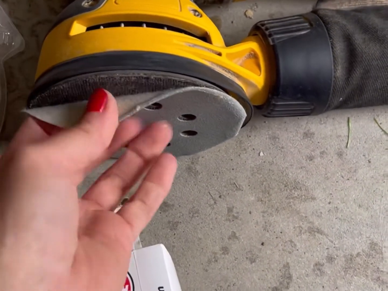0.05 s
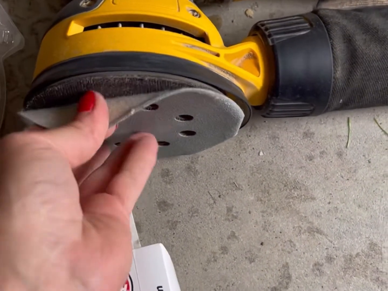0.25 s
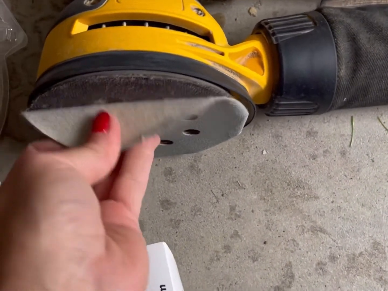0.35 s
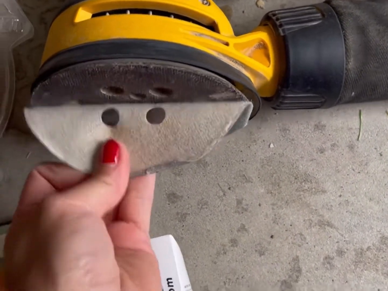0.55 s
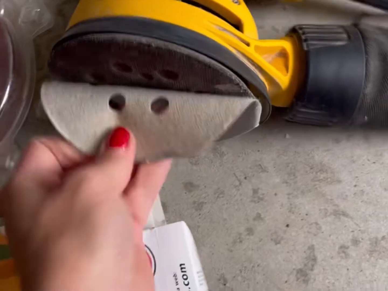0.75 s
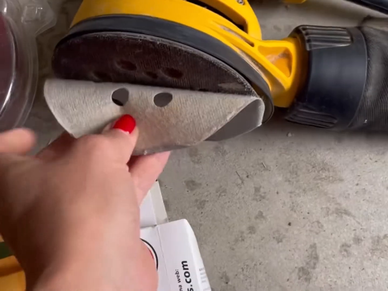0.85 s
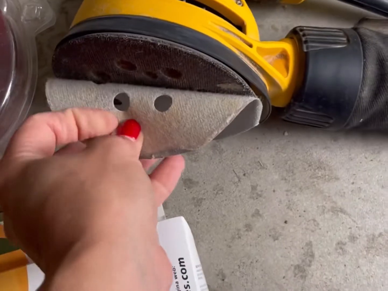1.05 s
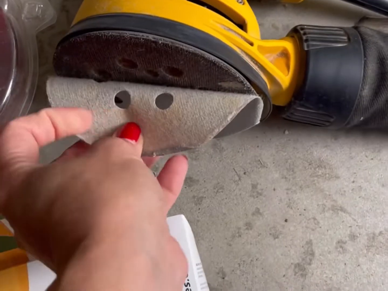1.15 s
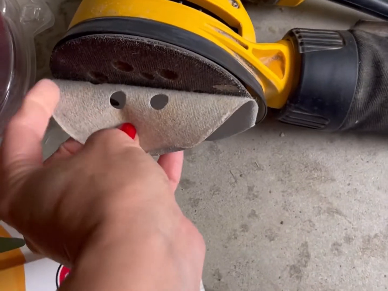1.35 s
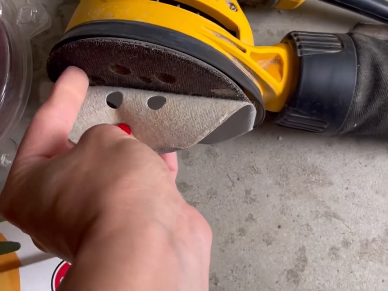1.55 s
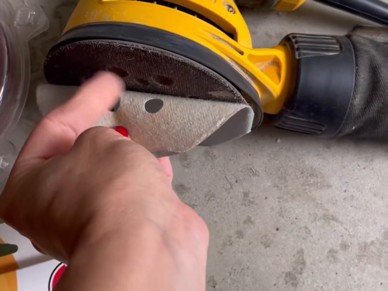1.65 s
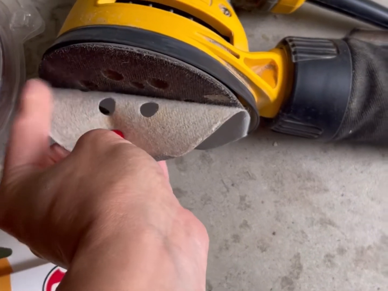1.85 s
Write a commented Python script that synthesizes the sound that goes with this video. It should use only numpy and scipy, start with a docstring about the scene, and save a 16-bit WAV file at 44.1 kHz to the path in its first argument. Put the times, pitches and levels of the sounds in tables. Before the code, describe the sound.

Close, bright hook-and-loop tearing as a stiff sanding disc is peeled from a switched-off sander

```python
"""Fingers rub softly over a workshop's low hum and rumble, then a sanding disc is peeled by hand off the
hook-and-loop pad of a switched-off sander, close to a microphone pair. Hooks tear in ragged bunches of
coloured clicks, in two pulls, and pluck the ringing paper; short click runs snap and slide, and pairs of
partials pop. The disc ticks with cracks and ringing modes, and fingers slide on it as fine grains.
Filtered noise makes the dull bumps of the hand; decaying noise makes the echoes of the room."""
import sys
import numpy as np
from scipy import signal
from scipy.fft import rfft, irfft
from scipy.io import wavfile

SR = 44100
rng = np.random.default_rng(int(sys.argv[2]) if len(sys.argv) > 2 else 0)


def generate_wav(signal):
    """Clip the signal to [-1, 1] and save it as 16-bit WAV at the path in sys.argv[1]."""
    frames = np.transpose(np.atleast_2d(signal))
    scaled = np.clip(frames, -1, 1) * 32767
    pcm = np.round(scaled).astype(np.int16)
    wavfile.write(sys.argv[1], SR, pcm)


N = 83790

# Force of the tearing hooks: (time [s], level [dB])
PEEL_FORCE = [(.13, -66.5), (.185, -49), (.238, -43.5), (.247, -27.5), (.272, -22), (.303, -23.5),
              (.35, -19), (.388, -24), (.402, -31.5), (.42, -35), (.448, -35.5), (.478, -32), (.506, -19.5),
              (.555, -19.5), (.583, -27.5), (.595, -35.5), (.643, -35), (.668, -49), (.72, -46.5),
              (.755, -52.5), (.80, -79.5)]
# Plucking of the freed flap of paper as it grows: (time [s], level against the hooks [dB])
FLAP_LEVEL = [(.2, -11.5), (.29, -20), (.37, -12.5), (.46, -12.5), (.52, -9.5), (.58, -8.5), (.66, -4),
              (.74, 7)]
# Spectra of hooks, paper, skin on grit, rasping rim and cracking disc: (frequency [Hz], relative level [dB])
HOOK_SPECTRUM = [(200, -53), (1000, -19), (2200, -15), (3800, -4), (5200, -2.5), (7000, -2), (8400, -4.5),
                 (9800, -3), (11200, 4), (12300, -7.5), (13400, -14), (14500, -34.5), (16000, -38.5)]
PAPER_SPECTRUM = [(80, -19.5), (250, -16), (550, -5.5), (900, -0.5), (1500, -1.5), (2100, -3), (2900, 6.5),
                  (3600, 6.5), (4500, -3.5), (7000, -3.5), (14000, -36)]
SKIN_SPECTRUM = [(200, -20.5), (1100, -8.5), (2500, -5), (4000, -12.5), (5600, -0.5), (7300, -2),
                 (8500, -4.5), (11000, 5), (12300, -5), (13600, -28.5), (16000, -32.5)]
RASP_SPECTRUM = [(300, -19), (1200, -25), (2500, -7), (3100, -9.5), (3900, 5.5), (5200, 3.5), (6500, -4),
                 (12000, -43)]
CRACK_SPECTRUM = [(200, -42.5), (550, -18.5), (900, 4), (1300, -9.5), (3000, -8.5), (4400, 3), (5700, 2.5),
                  (8300, 1.5), (9800, -17.5), (10900, 9), (12300, -20.5), (13500, -58), (16000, -52)]
# Spectra of the workshop's rumble and of the hiss: (frequency [Hz], relative level [dB])
RUMBLE_SPECTRUM = [(20, -36.5), (35, -5), (60, 1.5), (110, -3), (160, -7), (240, -15.5), (330, -23.5),
                   (600, -23), (900, -39), (1500, -37.5), (4000, -63), (12000, -69), (15000, -91)]
HISS_SPECTRUM = [(200, -2), (700, 7.5), (1200, 1), (2600, -1.5), (4000, -3), (8000, -5.5), (11000, -4.5),
                 (12200, -19), (13200, -35.5), (16000, -95)]
# Short click runs: snapping tufts, the paper's sliding tail near 0.72 s, and a weak disc tick at 1.101 s:
# (time of the middle [s], strength [dB], paper against hooks [dB], length [s])
CLICK_RUNS = [(0.1408, -6.5, -12.5, 0.00063), (0.1429, -11.5, -17.5, 0.0008), (0.164, -10, -8.5, 0.00097),
              (0.2067, -19, -12.5, .001), (0.2246, -7, -19, .001), (0.2387, -8.5, -25.5, 0.0011),
              (0.245, -3, -27.5, 0.0023), (.2605, -1, -19, 0.0016), (0.269, 3.5, -19, 0.0015),
              (0.2796, -2, -18.5, .0012), (0.2903, 1.5, -16, .0006), (0.314, 3, -21.5, .002),
              (0.341, 0.5, -18, .0012), (0.3432, 3.5, -15, 0.0009), (0.353, 1, -18.5, .003),
              (0.369, -0.5, -8.5, .0018), (0.389, 0, -13.5, 0.0026), (0.4118, -6.5, -6, .003),
              (0.419, -1, -5, 0.002), (0.4353, -6.5, -8, .0015), (0.4756, -4, -14.5, .003),
              (0.482, -0.5, -18, 0.0022), (0.4935, -1, -14.5, .0035), (0.51, -7.5, -2, .003),
              (0.5906, -5, -6, .001), (0.5974, 2, -21, 0.0007), (0.6174, -10.5, -0.5, .007),
              (.6322, 4, -7.5, 0.0022), (0.6389, 0.5, -9.5, 0.0044), (0.6616, -14, -13.5, 0.0008),
              (0.6697, -12.5, -3, 0.0009), (0.699, -25, 6, 0.0021), (0.722, -23, 8.5, .018),
              (0.743, -10, 2.5, .006), (0.755, -13, 0.5, 0.012), (1.101, -26.5, -11, .003)]
# Two-partial pops: the flap during the peel, then a low after-tick of the disc at 1.098 s:
# (time [s], strength [dB], pitch [Hz], upper partial [dB])
TWO_PARTIAL_POPS = [(0.4957, -5.5, 1230, 11), (0.5122, -14, 1240, 11), (.5815, -9.5, 660, -9.5),
                    (0.5960, -11, 1590, 4.5), (0.6316, -2.5, 1590, -3), (0.6713, -15, 1400, 11),
                    (1.0982, -22, 1040, -12)]
# Ticks of the stiff disc: (time [s], strength [dB], ring against crack [dB], favoured pitch [Hz])
DISC_TICKS = [(0.141, -19.5, 1, 3000), (0.1644, -24.5, 1.5, 2700), (0.5961, -12, 3.5, 3300),
              (0.6714, -21, 7.5, 3000), (0.865, -21.5, -5, 1700), (0.9863, -38, 5.5, 2300),
              (1.0814, -12, 9.5, 2900), (1.097, -24, -12, 1100), (1.468, -17, 1.5, 1900)]
# Modes of the disc: (frequency [Hz], relative level [dB], 60 dB decay [s])
DISC_RING_MODES = [(1040, -5.5, 0.026), (1590, 3.5, 0.016), (2253, 8, 0.011), (2650, 5.5, 0.0064),
                   (3050, 7.5, 0.0092), (3420, -9, 0.0081), (5300, 2.5, 0.0055), (7200, 10, .005)]
# Fingers sliding on the disc: (time of the peak [s], rise [s], fall [s], level [dB], rasp of the edge [dB])
FINGER_RUBS = [(0.037, 0.036, 0.051, -46, -14), (1.289, 0.035, 0.035, -53, -28),
               (1.443, 0.014, 0.014, -52.5, -26), (1.579, 0.004, 0.035, -53, -2),
               (1.610, 0.0097, 0.019, -42, -0.5), (1.624, 0.007, 0.01, -43, -4.5),
               (1.895, 0.018, 0.049, -52.5, -1.5)]
# Dull bumps and shuffles of the hand: (time of the peak [s], half length [s], level [dB], centre [Hz])
HAND_NUDGES = [(0.063, 0.09, -55.5, 414), (0.152, 0.09, -57.5, 370), (0.611, 0.016, -49.5, 172),
               (0.336, 0.02, -49, 388), (0.745, 0.034, -52, 277), (0.99, 0.0089, -53.5, 290),
               (1.34, 0.015, -46.5, 179)]
# Echoes arriving from the sides: (frequency [Hz], level against the direct sound [dB])
SIDE_ECHOES = [(250, -28), (600, -11), (1200, -13), (1900, -25), (3300, -15), (4200, -7), (5200, -9),
               (6000, -17), (7600, -7), (8800, -20), (10200, -13), (12500, -24)]
# Hum and rumble together: (time [s], level change [dB])
BASS_LEVEL = [(0, 1.5), (.65, -1.5), (.9, 2.5), (1.3, 1.5), (1.9, 0.5)]
# Microphone pair, phase: (frequency [Hz], lead of the left [rad])
PAIR_LEAD = [(250, 0), (600, .45), (1150, -.4), (1700, 0), (2700, .45), (3700, .1), (4300, 1), (4850, 3.3),
             (5400, 5.6), (6500, 6.7), (8600, 9.3), (9500, 9.5), (12000, 12.55)]
# Microphone pair, balance: (frequency [Hz], left minus right [dB])
PAIR_LEAN = [(400, 0), (700, 5.5), (1050, 6.5), (1600, 0), (3300, 1.5), (4100, -5.5), (5300, 0)]

# Hooks per second at a force of -20 dB; the rate goes as amplitude ** RATE_LAW
HOOKS_PER_S, RATE_LAW = 2900, .6
SCATTER_DB, COLOUR_DB = 3.6, 3.5  # spread of the hooks in size and in colour
BUNCH_PER_S, BUNCH_DB = 260, 2  # speed and depth of the bunching
# New shapes of the flap per second, unevenness of its modes, 60 dB decay, level of the bare pluck
FLEX_PER_S, FLEX_DB, RING_T60_S, PLUCK_DB = 70, 5.5, 0.021, 0.5
POP_RATIO, POP_RISE_S, POP_T60_S = 2.2, 0.00063, .015  # upper partial to pitch, onset, 60 dB decay
CONTACT_DB_PER_OCT = 6.5  # how fast modes away from the favoured pitch weaken
RATTLE_T60_S, RATTLE_DB = 0.045, -16.5  # flutter of the loose disc after a tick, against its ring
RUB_GRAINS_PER_S, RUB_SCATTER_DB = 14000, -1
NUDGE_Q = 1.37
SCATTER_HZ, FIRST_ECHO_S = 1260, 0.00047  # bottom of the scattered treble, delay of the first echo
NEAR_T60_S, NEAR_DB, WIDTH_T60_S = 0.011, -12, .025
TAIL_T60_S, TAIL_DB = 0.54, -18.5
ROOM_DB, RUMBLE_WAVER_DB = -48, 4  # rumble before BASS_LEVEL
HUM_HZ, HUM_DB, HUM_WAVER_DB = 118.2, -52.5, 1.5  # mean pitch, level before BASS_LEVEL
HISS_DB, SIDE_DB = -63, -10  # hiss common to both channels, opposed hiss against it
TOP_HZ = 15800  # upper limit of the microphone pair


def peel(t):
    """Hooks let go in bunches, faster and louder with the pull; each one also plucks the paper."""
    pull_db = curve(t, PEEL_FORCE)
    rate = HOOKS_PER_S * undb(pull_db + 20.0) ** RATE_LAW
    bunching = unit(undb(BUNCH_DB * walk(BUNCH_PER_S)))
    still_attached = t < PEEL_FORCE[-1][0]
    clicks = grains(rate, SCATTER_DB) * undb(pull_db) * bunching * still_attached
    plucks = clicks * undb(curve(t, FLAP_LEVEL))
    return colour(vary(clicks), HOOK_SPECTRUM) + flap(plucks)


def vary(clicks):
    """Give each hook's click its own colour, through random gains in overlapping bands."""
    f = np.arange(N // 2 + 1) * SR / N
    centres = np.linspace(0, TOP_HZ, 7)
    out = np.zeros(N)
    for band in np.eye(len(centres)):
        gains = unit(undb(COLOUR_DB * np.clip(rng.standard_normal(N), -2, 2)))
        band_response = np.interp(f, centres, band)
        out += irfft(rfft(clicks * gains) * band_response, N)
    return out


def flap(plucks):
    """Each time the flap bends, it rings at a new set of pitches."""
    age = np.arange(N // 20) / SR
    shape = (np.arange(N) / SR * FLEX_PER_S).astype(int)
    out = np.zeros(N + len(age))
    # 100 shapes of 24 modes outlast the peel
    places = rng.random((100, 24, 1))
    sizes = rng.standard_normal((100, 24, 1))
    for k, (place, size) in enumerate(zip(places, sizes)):
        span = np.flatnonzero(shape == k)
        if len(span):
            hz = 250 + 5000 * place ** 1.3
            decay = undb(FLEX_DB * size - 60 * age / RING_T60_S)
            modes = np.sum(np.sin(2 * np.pi * hz * age) * decay, axis=0)
            response = modes / np.linalg.norm(modes)
            out[span[0]:span[-1] + len(age)] += signal.fftconvolve(plucks[span], response)
    return colour(out[:N] / 2 + undb(PLUCK_DB) * plucks, PAPER_SPECTRUM)


def click_runs(t):
    """Each snap, slide or weak tick is a run of fine clicks that swells and dies, in two colours."""
    hooks, paper = np.zeros(N), np.zeros(N)
    for middle, db, paper_db, length in CLICK_RUNS:
        # age counts in run lengths, at least two samples each
        age = np.maximum(t - middle + length / 2, 0) / max(length, 2 / SR)
        run = grains(14000., 2.) * age * np.exp(-age ** 2)
        run = run / (np.linalg.norm(run) + 1e-9) * undb(db)
        hooks += run
        paper += run * undb(paper_db)
    return colour(hooks, HOOK_SPECTRUM) + colour(paper, PAPER_SPECTRUM)


def pops(t):
    """Two quickly fading partials for each pop of the flap and for the low after-tick of the disc."""
    out = np.zeros(N)
    for start, db, hz, upper_db in TWO_PARTIAL_POPS:
        age = np.maximum(t - start, 0)
        lower = np.sin(2 * np.pi * hz * age)
        upper = undb(upper_db) * np.sin(2 * np.pi * hz * POP_RATIO * age)
        envelope = (1 - np.exp(-age / POP_RISE_S)) * undb(-60 * age / POP_T60_S)
        tone = (lower + upper) * envelope
        out += tone / np.linalg.norm(tone) * undb(db)
    return out


def ticks(t):
    """A sharp crack, a brief ring and a flutter of the disc; the place of contact favours some modes."""
    crack, rings = np.zeros(N), np.zeros(N)
    age = t[:N // 10]
    for start, db, ring_db, favoured_hz in DISC_TICKS:
        push = np.zeros(N)
        push[min(int(start * SR), N - 1)] = undb(db)
        modes = np.zeros(len(age))
        for hz, mode_db, t60 in DISC_RING_MODES:
            contact_db = -CONTACT_DB_PER_OCT * abs(np.log2(hz / favoured_hz))
            decay = undb(mode_db + contact_db - 60 * age / t60)
            modes += decay * np.sin(2 * np.pi * hz * age) / hz
        # the difference turns displacement into velocity
        body = undb(ring_db) * ring(push, np.diff(modes, prepend=0))
        flutter_response = rng.standard_normal(len(age)) * age * undb(-60 * age / RATTLE_T60_S)
        flutter = ring(body, flutter_response)
        crack += push
        rings += body + undb(RATTLE_DB) * flutter
    ring_band = signal.butter(2, [800, 7500], "band", fs=SR, output="sos")
    return colour(crack, CRACK_SPECTRUM) + signal.sosfilt(ring_band, rings)


def rubs(t):
    """Skin catches on the grit in fine grains; over the rim it makes the edge rasp."""
    skin, edge = np.zeros(N), np.zeros(N)
    for peak, rise, fall, db, rasp_db in FINGER_RUBS:
        slope = np.where(t < peak, rise, fall)
        swell = np.exp(-np.abs((t - peak) / slope) ** 2.15)
        catches = grains(RUB_GRAINS_PER_S, RUB_SCATTER_DB) * swell * undb(db)
        skin += catches
        edge += catches * undb(rasp_db)
    return colour(skin, SKIN_SPECTRUM) + colour(edge, RASP_SPECTRUM)


def nudges(t):
    """Soft, dull bumps and shuffles: noise through two equal resonances, swelling and fading."""
    out = np.zeros(N)
    for peak, half, db, hz in HAND_NUDGES:
        b, a = signal.iirpeak(hz, NUDGE_Q, fs=SR)
        once = signal.lfilter(b, a, rng.standard_normal(N))
        body = signal.lfilter(b, a, once)
        out += unit(body) * undb(db) * np.exp(-((t - peak) / half) ** 2)
    return out


def workshop(t, dry):
    """Treble scattered by hand and sander, echoes from the sides, a faint tail different at each ear."""
    def tail(x, t60):
        """Dense echoes as decaying noise after the first echo's delay."""
        return ring(x, rng.standard_normal(N) * undb(-60 * t / t60) * (t > FIRST_ECHO_S))

    treble = signal.sosfilt(signal.butter(1, SCATTER_HZ, "high", fs=SR, output="sos"), dry)
    near = dry + undb(NEAR_DB) * tail(treble, NEAR_T60_S)
    f = np.arange(N // 2 + 1) * SR / N
    side = irfft(rfft(tail(dry, WIDTH_T60_S)) * undb(curve(f, SIDE_ECHOES)), N)
    left = near + side + undb(TAIL_DB) * tail(dry, TAIL_T60_S)
    right = near - side + undb(TAIL_DB) * tail(dry, TAIL_T60_S)
    return np.array([left, right])


def background(t):
    """Low rumble and a wavering hum, alike in both ears, with a thin, partly diffuse hiss."""
    rumble = colour(rng.standard_normal(N), RUMBLE_SPECTRUM)
    rumble = unit(rumble * undb(RUMBLE_WAVER_DB * walk(8.62))) * undb(ROOM_DB)
    hum = np.sin(2 * np.pi * HUM_HZ * t + .3 * walk(3))  # the phase wanders
    hum = unit(hum * undb(HUM_WAVER_DB * walk(5))) * undb(HUM_DB)
    bass = (rumble + hum) * undb(curve(t, BASS_LEVEL))
    mid = unit(colour(rng.standard_normal(N), HISS_SPECTRUM)) * undb(HISS_DB)
    side = unit(colour(rng.standard_normal(N), HISS_SPECTRUM)) * undb(HISS_DB)
    return bass + mid + undb(SIDE_DB) * np.array([side, -side])


def undb(db):
    """Decibels to gain."""
    return 10 ** (np.asarray(db) / 20)


def curve(x, rows):
    """Straight lines through the rows of a table."""
    return np.interp(x, *np.array(rows, float).T)


def unit(x):
    """Scale to rms 1."""
    return x / np.sqrt(np.mean(x ** 2) + 1e-18)


def walk(rate):
    """Smooth random wander of rms 1, through this many random points a second."""
    knots = rng.standard_normal(N // 10)
    return unit(np.interp(np.arange(N) / SR * rate, np.arange(len(knots)), knots))


def ring(x, response):
    """Pass a sound through an impulse response scaled to unit energy."""
    return signal.fftconvolve(x, response / np.linalg.norm(response))[:N]


def colour(x, points, size=4096):
    """Causal minimum-phase filter with the given spectrum, at unit energy."""
    hz, db = np.array(points, float).T
    f = np.maximum(np.arange(size // 2 + 1) * SR / size, 1)
    gain = undb(np.interp(np.log(f), np.log(hz), db))
    # folding the cepstrum forward in time makes the filter causal
    cepstrum = irfft(np.log(gain))
    cepstrum[1:size // 2] *= 2
    cepstrum[size // 2 + 1:] = 0
    return ring(x, irfft(np.exp(rfft(cepstrum))))


def grains(rate, scatter_db):
    """Random clicks of uneven size and either sign, with a mean power of about 1."""
    chance = np.clip(rate / SR, 1e-6, 1)
    size = unit(undb(scatter_db * np.clip(rng.standard_normal(N), -2, 2)))
    size = size * rng.choice([-1, 1], N)
    return (rng.random(N) < chance) * size / np.sqrt(chance)


def scene():
    """The peel and the disc's noises in the room, with the hand's bumps and the background."""
    t = np.arange(N) / SR
    disc = peel(t) + click_runs(t) + pops(t) + ticks(t) + rubs(t)
    return workshop(t, disc) + nudges(t) + background(t)


def record(dry):
    """The microphone pair shifts phase and level between the ears; the top is cut."""
    f = np.arange(N + 1) * SR / (2 * N)
    lead = curve(f, PAIR_LEAD)
    lean = undb(curve(f, PAIR_LEAN))
    same_power = np.sqrt(2 / (1 + lean ** 2))
    pair = np.array([lean, np.exp(-1j * lead)]) * same_power
    heard = irfft(rfft(dry, 2 * N) * pair)[:, :N]
    return signal.sosfilt(signal.ellip(8, .2, 80, TOP_HZ, fs=SR, output="sos"), heard)


dry = scene()
out = record(dry)
generate_wav(out)
```